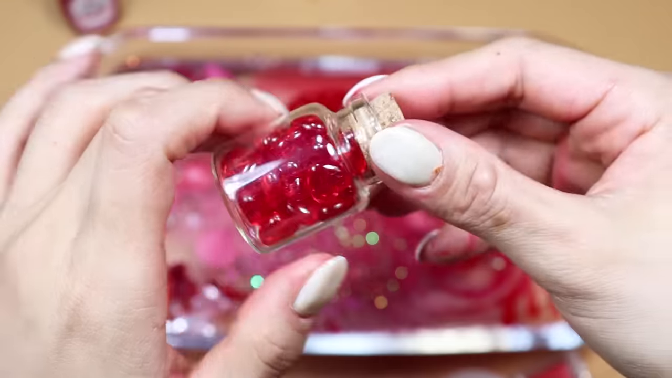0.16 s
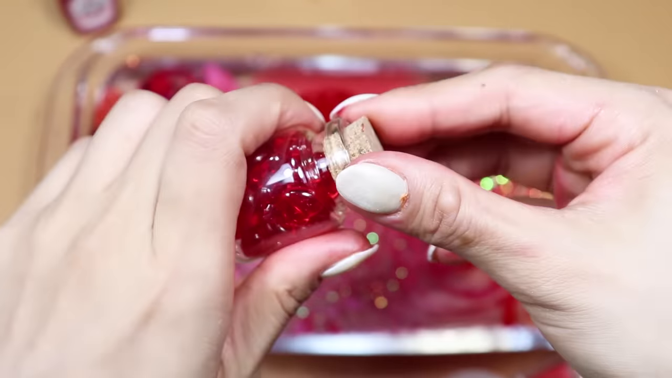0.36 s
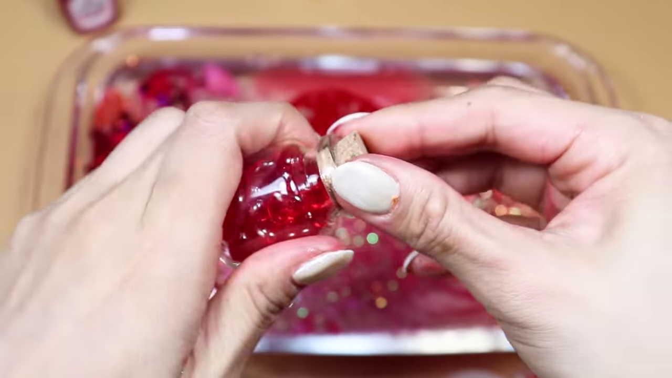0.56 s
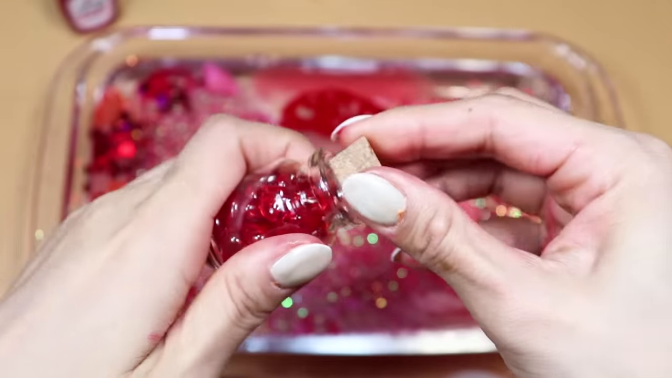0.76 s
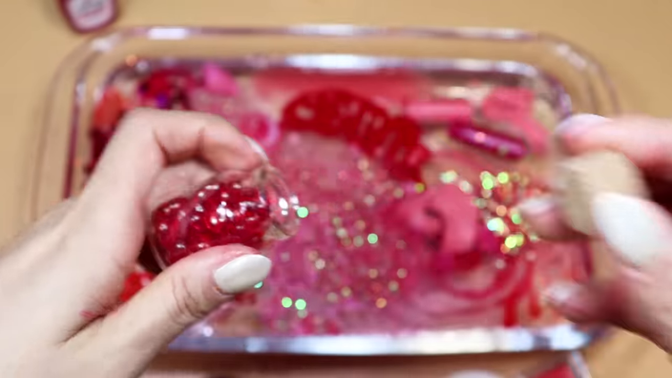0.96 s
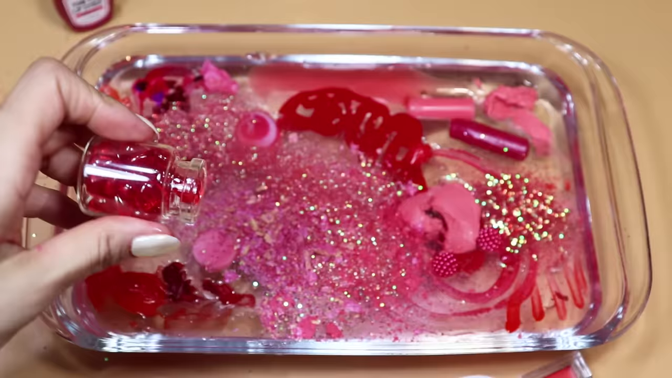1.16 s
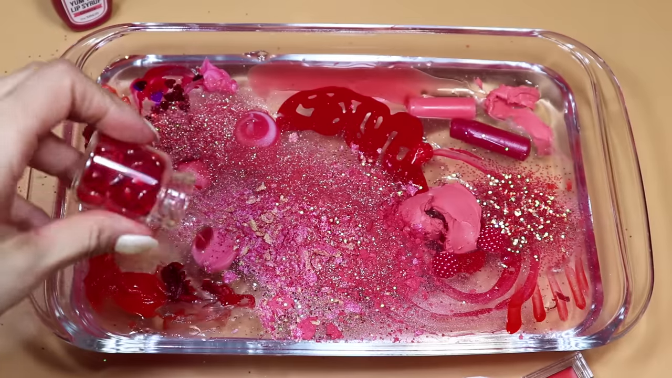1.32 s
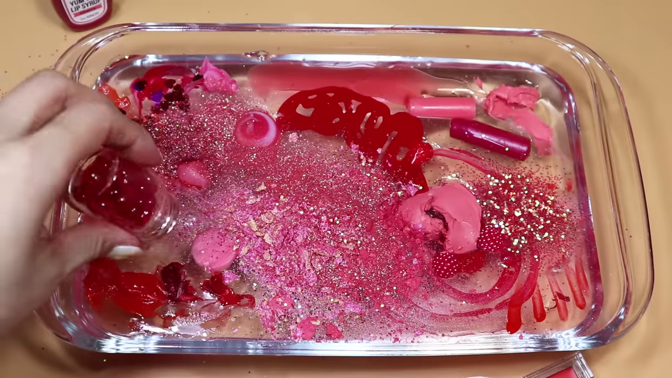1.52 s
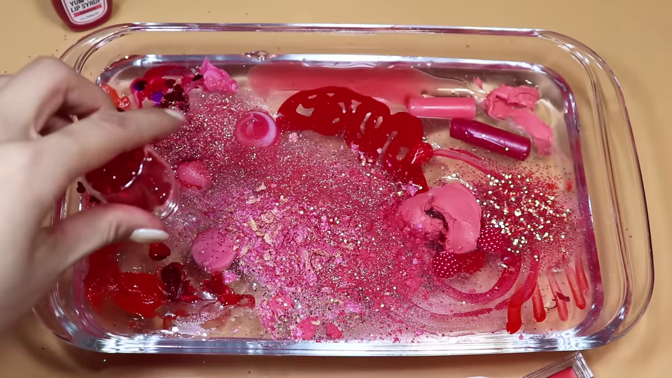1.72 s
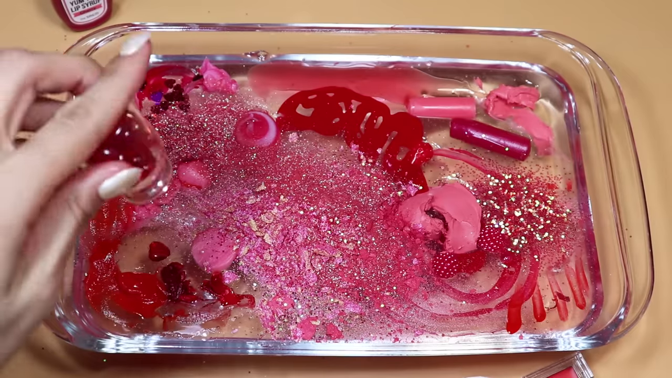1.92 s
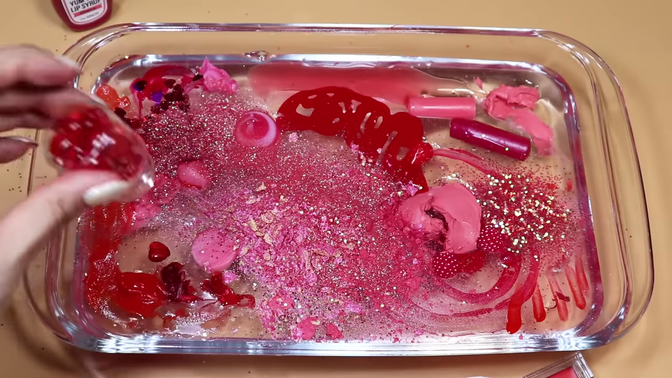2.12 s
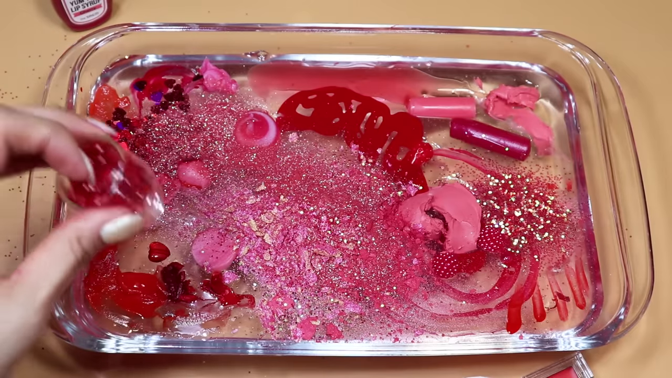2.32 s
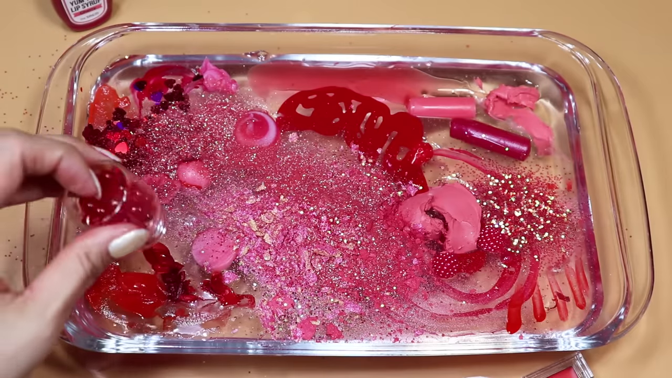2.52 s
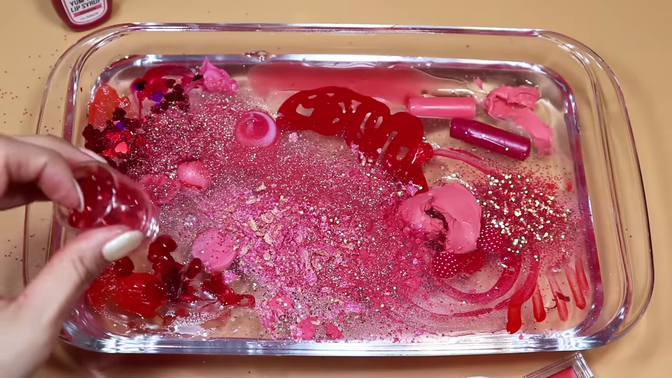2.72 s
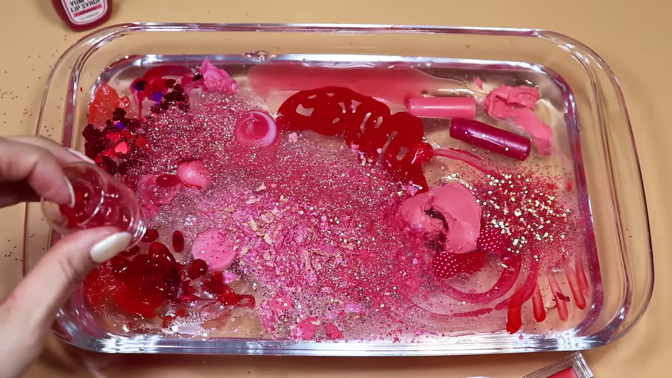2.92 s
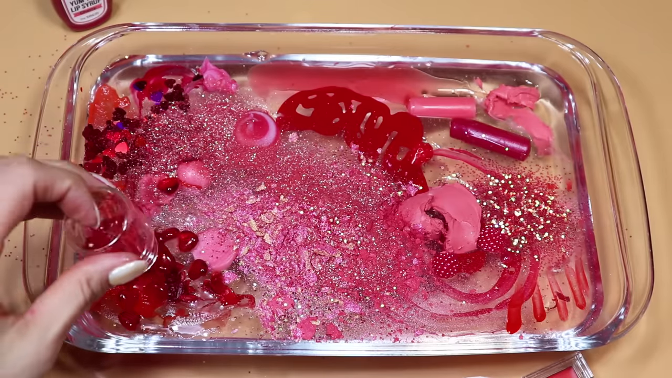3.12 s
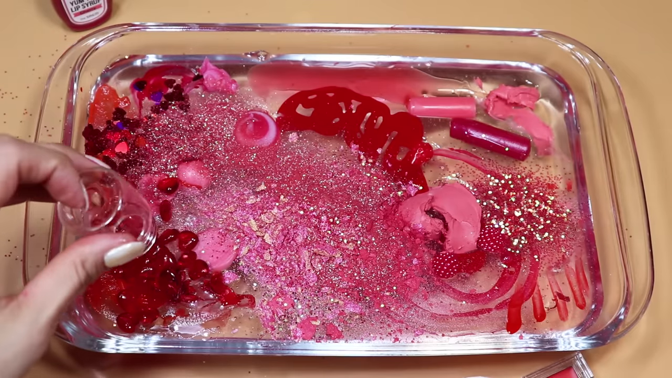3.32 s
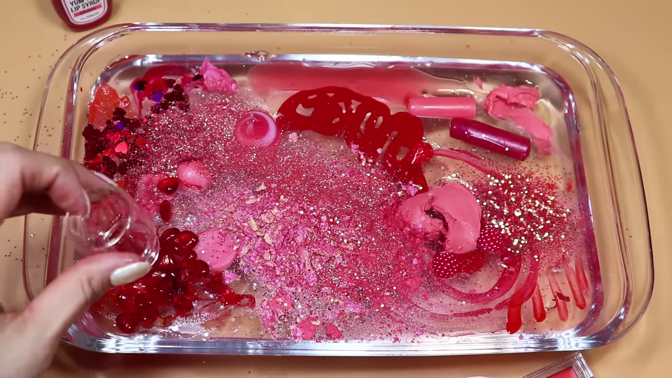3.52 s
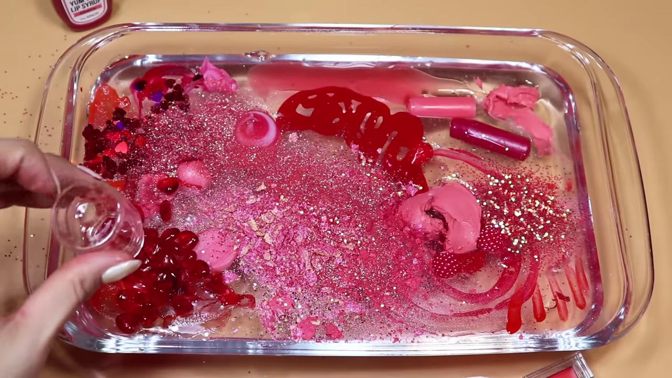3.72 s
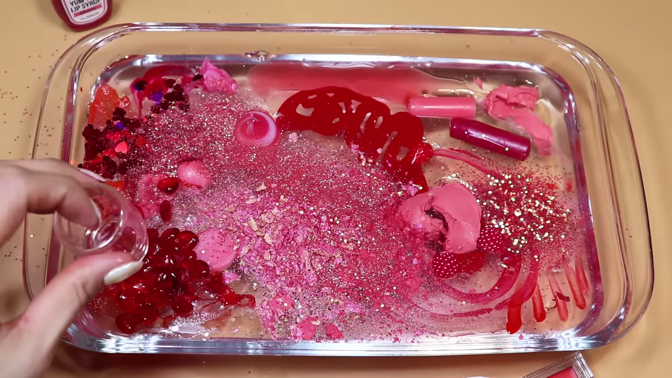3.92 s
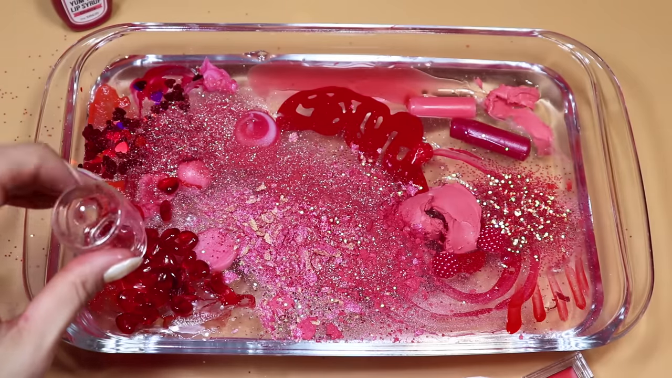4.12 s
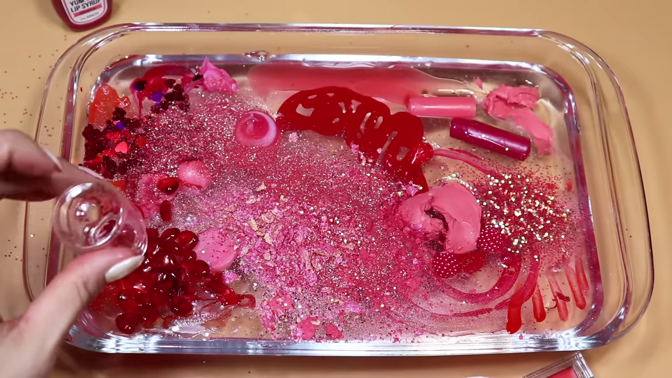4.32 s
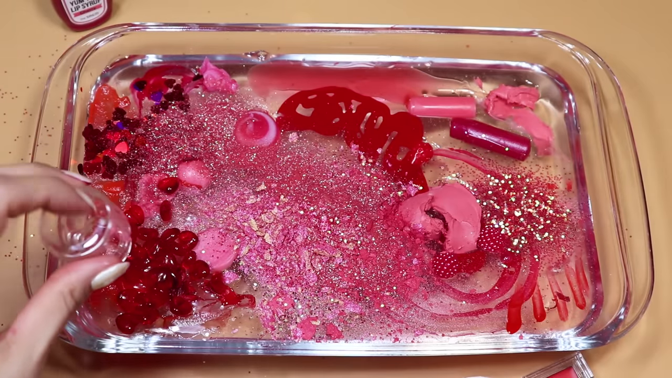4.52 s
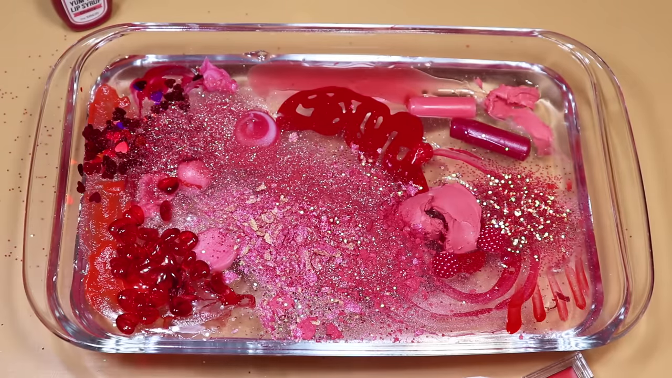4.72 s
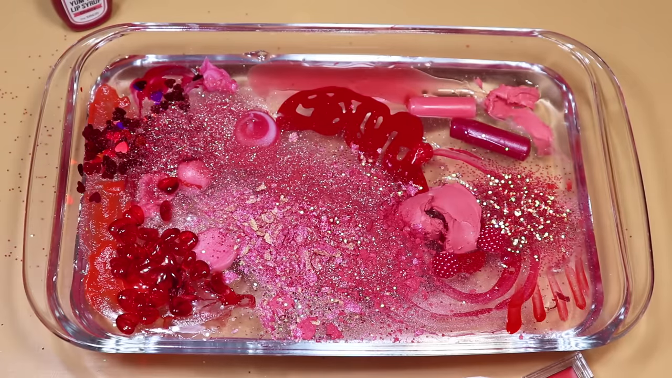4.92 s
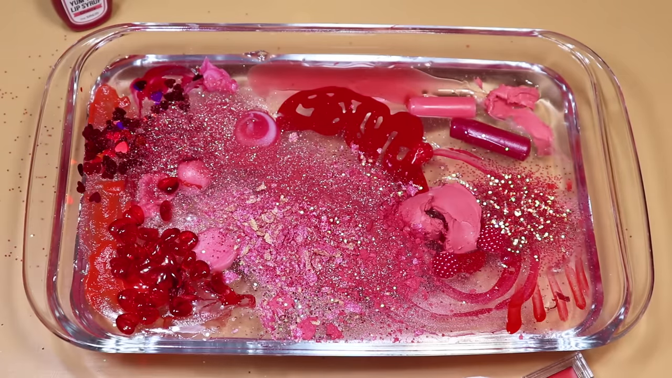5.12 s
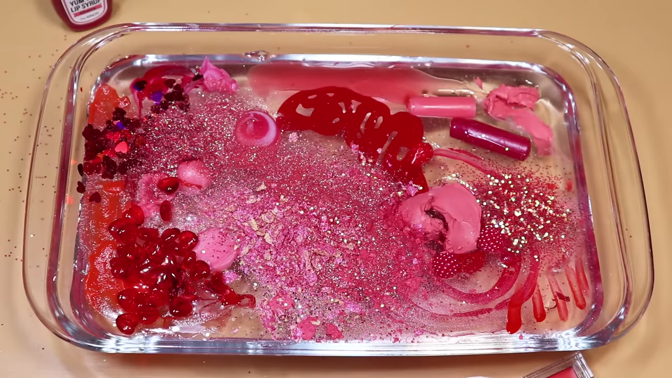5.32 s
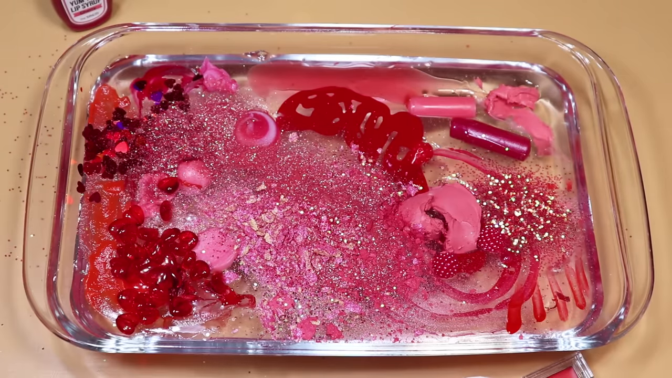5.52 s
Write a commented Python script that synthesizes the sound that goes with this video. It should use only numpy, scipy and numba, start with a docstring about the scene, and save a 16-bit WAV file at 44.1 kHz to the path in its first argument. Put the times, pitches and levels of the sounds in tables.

```python
"""Small hard beads, shaken from a little glass bottle into a glass dish, close up in a quiet room.
The cork creaks and twists faintly, beads and glass tick in the hand, then each shake sends a surge
of beads through the neck. They clack together, tink on the glass and ring the air in the bottle,
lower as it empties. A few last taps follow, and a soft knock as the bottle is put aside."""
import sys
import numpy as np
from scipy import signal
from scipy.fft import rfft, irfft, next_fast_len
from scipy.io import wavfile
from scipy.ndimage import uniform_filter1d
from numba import njit

SR = 44100
rng = np.random.default_rng(int(sys.argv[2]) if len(sys.argv) > 2 else 0)


def put_to_file(sound):
    """Save the sound as 16-bit audio at rate SR, in the file named by the first command-line argument."""
    columns = np.atleast_2d(sound).T  # one column per channel
    safe = np.clip(columns, -1, 1)
    whole_steps = np.round(safe * 32767)
    wavfile.write(sys.argv[1], SR, whole_steps.astype(np.int16))


N = 245333
TIME_S = np.arange(N) / SR


def from_db(db):
    return 10 ** (np.asarray(db) / 20)


def unit_rms(x):
    return x / np.sqrt(np.mean(x ** 2) + 1e-20)


def evened(x, window_s):
    """Hold short-term power near 1."""
    return x / np.sqrt(np.abs(uniform_filter1d(x ** 2, int(window_s * SR))) + 1e-12)


def at_hz(points, hz):
    """Interpolate a table over log frequency."""
    known_hz, values = np.transpose(points)
    return np.interp(np.log(np.maximum(hz, 1)), np.log(known_hz), values)


def add(track, start_s, sound):
    start = int(round(start_s * SR))
    track[:, start:start + sound.shape[-1]] += sound[..., :N - start]


def coloured(x, colour, size=1024):
    """Minimum-phase, unit-energy filter with the given spectrum."""
    cepstrum = irfft(np.log(from_db(at_hz(colour, np.fft.rfftfreq(size, 1 / SR)))))
    cepstrum[1:size // 2] *= 2
    cepstrum[size // 2 + 1:] = 0
    response = irfft(np.exp(rfft(cepstrum)))
    return signal.oaconvolve(x, [response / np.linalg.norm(response)], axes=1)[:, :N]


@njit
def two_pole(x, angle_rad, radius):
    """Moving band-pass, peak gain 1."""
    y = np.zeros(len(x))
    for i in range(2, len(x)):
        drive = (1 - radius ** 2) / 2 * (x[i] - x[i - 2])
        y[i] = drive + 2 * radius * np.cos(angle_rad[i]) * y[i - 1] - radius ** 2 * y[i - 2] + 1e-18
    return y


def resonance(x, curve, width_hz):
    """Stereo resonator following a (t/s, f/Hz) curve."""
    angle_rad = 2 * np.pi * np.interp(TIME_S, *np.transpose(curve)) / SR
    radius = np.exp(-np.pi * width_hz / SR)
    return np.array([two_pole(side, angle_rad, radius) for side in x])


def contacts(rows, chatter, chatter_s, size=256):
    """Per row, one sharp push and a brief chatter, different on each side."""
    track, t = np.zeros((2, N)), np.arange(size) / SR
    for (start_s, db, *_), grit in zip(rows, rng.standard_normal((len(rows), 2, size))):
        push = chatter * grit * np.exp(-t / chatter_s)
        push[:, 0] = 1
        add(track, start_s, from_db(db) * push / np.linalg.norm(push[0]))
    return track


def emptying_db(t, full_db, empty_db, start_s=2.55, span_s=0.36):
    """Gain ramp as the bottle empties."""
    return np.interp(t, [start_s, start_s + span_s], [full_db, empty_db])


# Room air spectrum: f/Hz, level/dB
ROOM_AIR = [(15, -63), (25, -32), (53, -2), (137, -4.5), (170, -5), (236, -3), (285, -5), (317, -7.5),
            (641, -10), (695, -13.5), (1330, -13), (1700, -16.5), (5000, -22), (13600, -31.5),
            (16000, -38.5)]
# Hum notes: f/Hz, level/dB
HUM_NOTES = [(66, -69.5), (93.5, -74), (134, -67.5), (198, -70.5), (238, -68.5)]
# Left-right likeness: f/Hz, coherence
COHERENCE = [(30, 1), (80, 0.7), (170, 0.69), (350, 0.47), (700, 0.27), (1500, 0.11), (4000, 0.011),
             (12000, 0.071)]


def room_tone(air_db=-55.5, hum_width_hz=1.9):
    """Steady air noise and wavering hum, alike on both sides only in the bass."""
    size = next_fast_len(N)
    hz = np.fft.rfftfreq(size, 1 / SR)
    mid, side = rfft(rng.standard_normal((2, size)))
    alike = np.clip(at_hz(COHERENCE, hz), -1, 1)
    noise = np.sqrt(1 + alike) * mid + np.sqrt(1 - alike) * side * [[1], [-1]]
    air = from_db(air_db) * unit_rms(from_db(at_hz(ROOM_AIR, hz)))
    hum = sum(from_db(db) * unit_rms(1 / (1 + ((hz - note_hz) / hum_width_hz) ** 2))
              for note_hz, db in HUM_NOTES)
    return irfft(noise * np.hypot(air, hum), size)[:, :N]


# Faint cork creaks, then beads and glass ticking in the hand: t/s, level/dB
TICKS = [(0.3845, -38), (0.403, -48), (0.834, -34.5), (0.8457, -39), (0.8859, -35), (0.8957, -33.5),
         (1.2116, -24), (1.2367, -25.5), (1.2885, -31), (1.3096, -33.5), (1.3312, -34), (1.3618, -30.5),
         (1.3783, -40), (1.6587, -34.5), (1.7354, -34.5), (1.784, -37), (2.2023, -34.5)]
# Tick spectrum: f/Hz, level/dB
TICK_COLOUR = [(300, -11), (1000, 7), (2000, 6.5), (3400, 9.5), (4300, 9), (5200, 8), (7000, 6),
               (10000, 3.5), (16000, -2.5)]
# Modes of the full, held bottle: f/Hz, level/dB, width/Hz
HELD_MODES = [(2960, -5, 300), (4380, 2.5, 110), (5630, -2, 160)]


def handling():
    """Cork creaks and light ticks briefly ring the full bottle."""
    ticks = coloured(contacts(TICKS, chatter=1.0, chatter_s=0.0021), TICK_COLOUR)
    return ticks + sum(from_db(db) * resonance(ticks, [(0, hz)], width_hz)
                       for hz, db, width_hz in HELD_MODES)


# Air resonance of the bottle: t/s, f/Hz
AIR_MODE = [(1.3, 1623), (1.75, 1760), (2.42, 1710), (2.48, 1534), (2.62, 1534), (2.74, 1400), (3.05, 1320),
            (3.25, 1314), (3.5, 1530), (4.55, 1530)]


def bottle_knocks(thud_db=-17, thud_hz=1450):
    """Contacts ring the air inside; blows on glass also thud, and count more once the beads are gone."""
    blows = [(t, db + emptying_db(t, full_db=-5, empty_db=12)) for t, db, _ in GLASS_HITS]
    on_glass = contacts(blows, chatter=0.015, chatter_s=0.00072)
    on_beads = from_db(-1) * contacts(BEAD_HITS, chatter=0.06, chatter_s=0.00044)
    ticks = from_db(21) * contacts(TICKS, chatter=0.021, chatter_s=0.00096)
    ring = resonance(on_glass + on_beads + ticks, AIR_MODE, width_hz=32)
    thud = resonance(on_glass, [(0, thud_hz)], width_hz=1300)
    return ring + from_db(thud_db) * thud


# A faint cork twist, then bead surges: t/s, hold/s, rattle level/dB, air re rattle/dB
SURGES = [(0.838, .06, -64, 0), (1.286, 0.088, -55, 1.5), (1.68, .005, -65.5, 9.5),
          (1.73, .005, -53.5, 4.5), (1.988, 0.0054, -50, 6), (2.265, 0.0085, -38.5, -5),
          (2.317, 0.0027, -31.5, -1.5), (2.402, 0.035, -40.5, -6), (2.450, 0.018, -32, 2),
          (2.59, .012, -36, 0.5), (2.617, 0.0068, -40, 1), (2.713, 0.037, -33.5, -2),
          (2.82, 0.027, -39.5, -5), (2.865, 0.035, -34, -1.5), (2.936, 0.035, -38, -6),
          (2.978, 0.048, -38.5, 0.5), (3.106, 0.02, -39, -1.5), (3.209, 0.024, -38, -3),
          (3.235, 0.021, -35, 1), (3.359, 0.019, -40, 3), (3.389, 0.015, -37.5, 0),
          (3.453, 0.0031, -43.5, 4), (3.486, 0.0055, -43.5, -5)]
# Thin trickle between shakes: one row, same columns
TRICKLE = (2.5, 0.98, -50, -3)


def flow(fall_db_per_s, of_air, swell_db_per_s=2200):
    """Envelope of the rattle or the air it stirs: swell, hold, fall."""
    power = 0
    for start_s, hold_s, rattle_db, air_db in SURGES + [TRICKLE]:
        top_db = rattle_db + air_db if of_air else rattle_db
        before_db = swell_db_per_s * np.maximum(start_s - TIME_S, 0)
        after_db = fall_db_per_s * np.maximum(TIME_S - start_s - hold_s, 0)
        power += from_db(top_db - np.minimum(before_db + after_db, 120)) ** 2
    return np.sqrt(power)


# Rattle spectrum up to 15 kHz, then a steep low-pass: f/Hz, level/dB
RATTLE_FILTER = [(200, -16.5), (600, -10.5), (1100, -8), (2100, -7.5), (3800, -3), (5500, 0), (8000, 2),
                 (10000, 4.5), (12000, -5.5), (14000, 1.5), (15300, -5), (16000, -69)]
# Lengthwise air resonance: t/s, f/Hz
LENGTH_MODE = [(2.75, 5440), (2.98, 6400), (3.3, 6900)]


def rattle(hits_per_s=2000, spread_db=3.5, side_spread_db=19, mouth_cutoff_hz=1070):
    """The cork twists, then beads jostle through the neck. Returns clatter and the longer air ring."""
    sizes = from_db(spread_db * np.minimum(rng.exponential(1, N), 3)) * rng.choice([-1, 1], N)
    hits = sizes * (rng.random(N) < hits_per_s / SR)
    clatter = coloured(hits * from_db(side_spread_db * rng.random((2, N))), RATTLE_FILTER)
    length_ring = from_db(6) * resonance(clatter, LENGTH_MODE, width_hz=410)
    clatter = evened(clatter + length_ring, window_s=0.02)
    bared_glass = from_db(emptying_db(TIME_S, full_db=-8, empty_db=13.5))
    glass_ring = bared_glass * resonance(clatter, [(0, GLASS_MODES[1][0])], width_hz=510)
    air = resonance([hits, hits], AIR_MODE, width_hz=89)
    # the small mouth radiates little below resonance
    air = signal.sosfilt(signal.butter(4, mouth_cutoff_hz, "high", fs=SR, output="sos"), air)
    return (flow(fall_db_per_s=654, of_air=False) * (clatter + glass_ring),
            flow(fall_db_per_s=512, of_air=True) * evened(air, window_s=0.016))


# Bead on glass: t/s, level/dB, T60/s
GLASS_HITS = [(1.9673, -5.5, 0.0098), (2.1496, -32, .003), (2.159, -37, 0.0037), (2.2591, -4, 0.0044),
              (2.2645, -4, .006), (2.269, -1, 0.0045), (2.2766, -12, .008), (2.4027, -2.5, .0042),
              (2.4066, -1, .0043), (2.4108, -2, 0.0033), (2.551, -2.5, 0.0093), (2.5589, -3.5, 0.0061),
              (2.629, -11.5, 0.0061), (2.6814, -2.5, 0.027), (2.696, -5.5, 0.029), (2.8728, -11, 0.016),
              (2.993, -19, .022), (3.3652, -10, .014), (3.386, -6.5, .008), (3.459, -17, .012),
              (3.995, -13.5, .0033), (4.27, -7, .0022), (4.535, -7, 0.0025)]
# Glass modes: f/Hz, level/dB
GLASS_MODES = [(14400, -7), (15080, 0), (15330, -3)]
# Impact spectrum: f/Hz, level/dB
CRACK_COLOUR = [(300, -60), (1000, -8.5), (4500, -7), (7500, -0.5), (11000, 4), (13000, 10.5), (15200, -6),
                (16500, 5)]


def tinks(crack_db=2.5, ring_db=-3.5, vary_db=4.5, attack_s=0.0001, size=2048):
    """Each blow cracks and rings the glass modes in its own mix; fingers and beads damp them."""
    pushes = contacts(GLASS_HITS, chatter=0.07, chatter_s=0.0015)
    track = from_db(crack_db) * coloured(pushes, CRACK_COLOUR)
    t = np.arange(size) / SR
    mode_hz, mode_db = np.transpose(GLASS_MODES)
    for start_s, db, t60_s in GLASS_HITS:
        gains = from_db(mode_db + vary_db * rng.standard_normal(len(mode_db)))
        modes = gains @ np.cos(2 * np.pi * np.outer(mode_hz, t))
        ring = modes * from_db(-60 * t / t60_s) * (1 - np.exp(-t / attack_s))
        add(track, start_s, from_db(db + ring_db) * ring / np.abs(ring).max())
    return track


# Bead on bead: t/s, level/dB, ping f/Hz
BEAD_HITS = [(2.4490, -19, 8050), (2.4655, -27, 8300), (2.514, -23, 14800), (2.6389, -16, 9800),
             (2.76, -11.5, 14000), (2.8112, -12, 14500), (2.8241, -28, 10000), (2.922, -10.5, 9600),
             (2.973, -16, 6440), (2.9964, -11, 10300), (3.0365, -13.5, 12800), (3.0655, -16, 6480),
             (3.1005, -20, 6540), (3.1128, -13, 12900), (3.142, -12, 13400), (3.1964, -12.5, 13500),
             (3.2360, -13, 14100), (3.2559, -12, 10700), (3.2978, -13, 13800), (3.3583, -8.5, 10800),
             (3.4052, -9.5, 14100), (3.4605, -20, 7100), (3.4872, -10.5, 10200), (3.5192, -16, 9600),
             (3.5728, -10.5, 12900), (3.578, -19, 12800), (3.5895, -20.5, 11800)]
# Impact spectrum: f/Hz, level/dB
SNAP_COLOUR = [(300, -57), (1000, -27), (2500, -6), (4200, -3.5), (6500, 5.5), (10000, 8), (14000, 7),
               (16500, -16)]


def clacks(snap_db=5.7, ping_db=-9, t60_cycles=74, size=512):
    """A bead lands on others: a snap, the lengthwise air ring and a ping at its own pitch."""
    pushes = contacts(BEAD_HITS, chatter=0.14, chatter_s=0.0007)
    snaps = from_db(snap_db) * coloured(pushes, SNAP_COLOUR)
    length_ring = from_db(-2) * resonance(snaps, LENGTH_MODE, width_hz=210)
    pings, t = np.zeros((2, N)), np.arange(size) / SR
    for start_s, db, hz in BEAD_HITS:
        envelope = from_db(db + ping_db - 60 * t * hz / t60_cycles)
        add(pings, start_s, envelope * np.cos(2 * np.pi * hz * t))
    return snaps + length_ring + pings


def set_down(start_s=5.3755, level_db=-40.5, hz=1410, t60_s=0.1, size=4096):
    """The empty bottle is put aside: the soft blow wakes one hollow note."""
    track, t = np.zeros((2, N)), np.arange(size) / SR
    add(track, start_s, from_db(level_db - 60 * t / t60_s) * np.sin(2 * np.pi * hz * t))
    return track


def placed(x, right_db, lag_s=66e-6):
    """Source on the left: the right channel arrives later, at its own level."""
    size = next_fast_len(N)
    delay = np.exp(-2j * np.pi * np.fft.rfftfreq(size, 1 / SR) * lag_s)
    late = irfft(rfft(x[1], size) * delay, size)[:N]
    return np.array([x[0], from_db(right_db) * late])


# Room decay: f/Hz, T60/s
ROOM_DECAY = [(1500, 0.82), (6000, 0.46), (15000, 0.28)]


def reverb(x, early_db=-2.5, early_t60_s=0.1, tail_db=-10, size=16384):
    """Quick scatter from dish and table, then a tail that dies sooner in the treble."""
    t, hz = np.arange(size) / SR, np.fft.rfftfreq(size, 1 / SR)
    white = rfft(rng.standard_normal((2, size)))
    band_hz, band_t60_s = np.transpose(ROOM_DECAY)
    tail = 0
    for band, t60_s in zip(np.eye(len(band_hz)), band_t60_s):
        tail += irfft(white * np.interp(hz, band_hz, band)) * from_db(-60 * t / t60_s)
    tail = from_db(tail_db) * unit_rms(tail * (t > 0.005))
    early = rng.standard_normal((2, size)) * from_db(-60 * t / early_t60_s)
    early = from_db(early_db) * unit_rms(early * (t > 0.0005))
    return signal.oaconvolve(x[None], (early + tail) / np.sqrt(size), axes=1)[:, :N]


def scene():
    """Hard contacts, the hollow note they wake in the bottle, and the room."""
    clatter, stirred_air = rattle()
    glass = tinks()
    beads = clacks()
    jostle = from_db(3) * clatter + from_db(9.5) * handling()
    hollow = from_db(-2) * stirred_air + bottle_knocks() + set_down()
    direct = (placed(glass + beads, right_db=-5.5) + placed(jostle, right_db=-0.5)
              + placed(hollow, right_db=1.9, lag_s=50e-6))
    send = from_db(-7.5) * glass + beads + from_db(-3.5) * (jostle + hollow)
    return direct + reverb(send[0]) + room_tone()


def record(dry):
    """Steep low-pass."""
    cutoff_hz = 16500
    return signal.sosfilt(signal.ellip(10, 0.2, 70, cutoff_hz, fs=SR, output="sos"), dry)


dry = scene()
out = record(dry)
put_to_file(out)
```